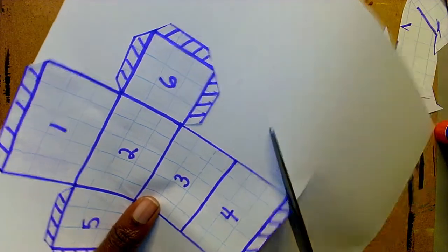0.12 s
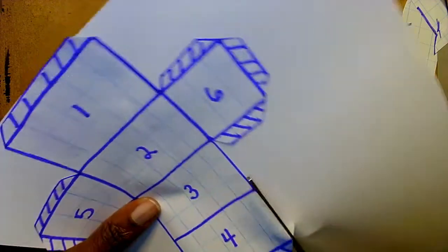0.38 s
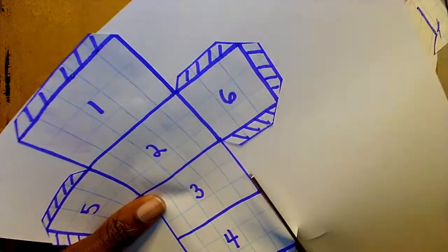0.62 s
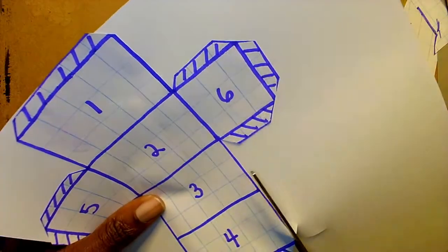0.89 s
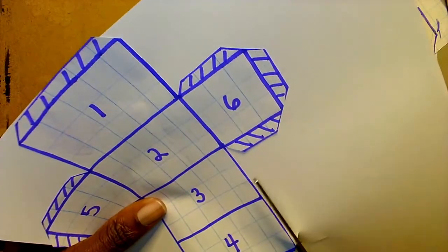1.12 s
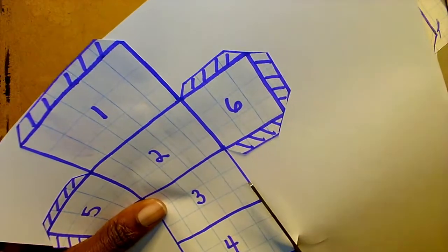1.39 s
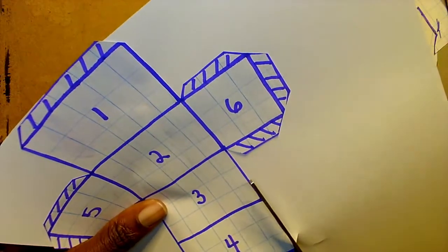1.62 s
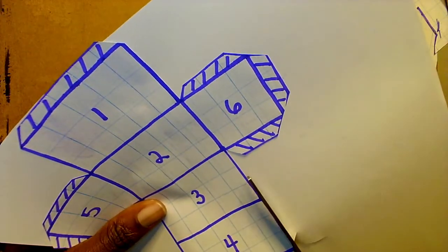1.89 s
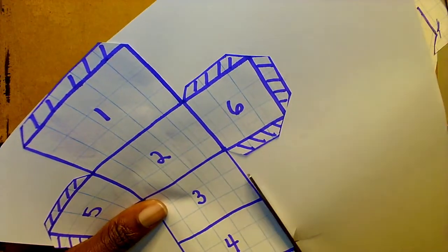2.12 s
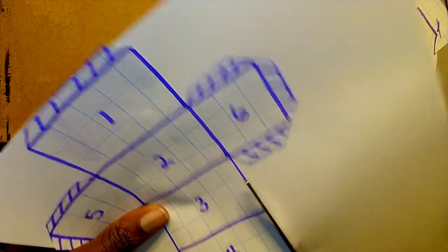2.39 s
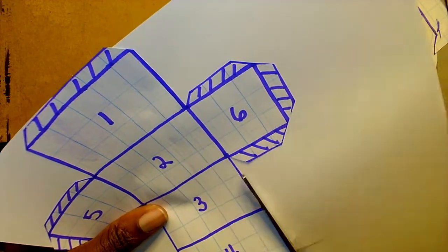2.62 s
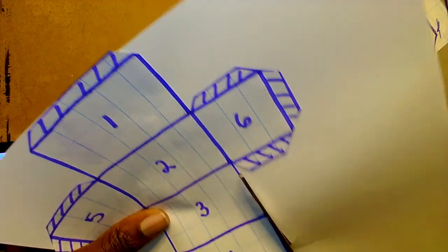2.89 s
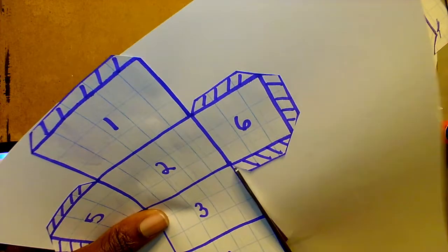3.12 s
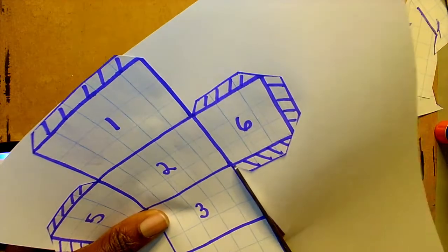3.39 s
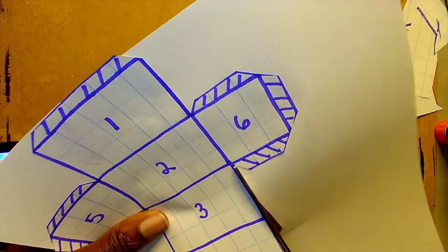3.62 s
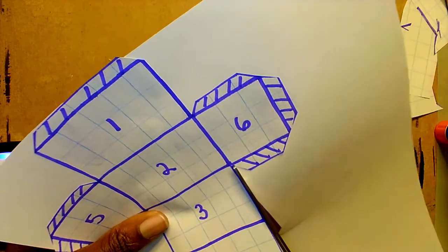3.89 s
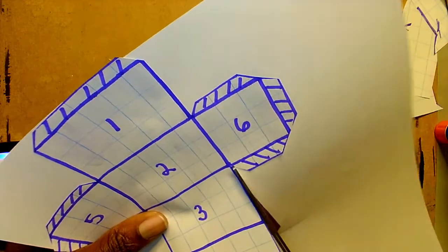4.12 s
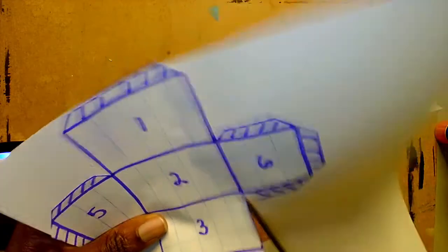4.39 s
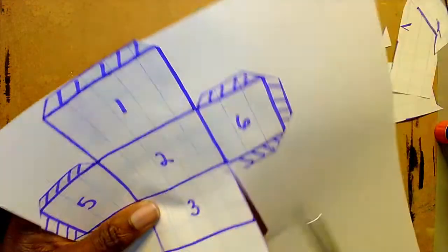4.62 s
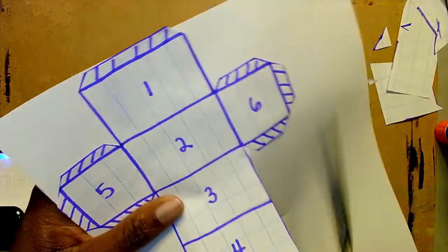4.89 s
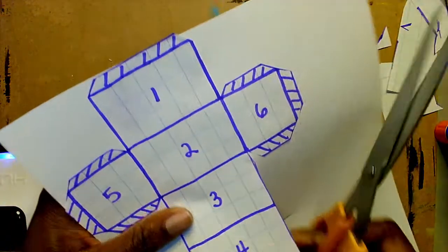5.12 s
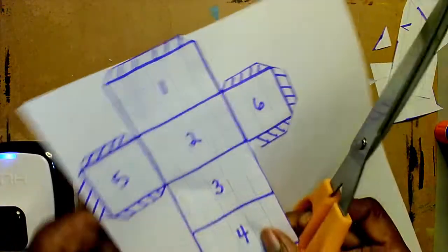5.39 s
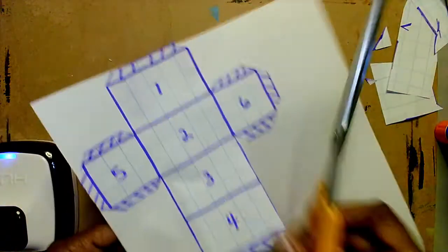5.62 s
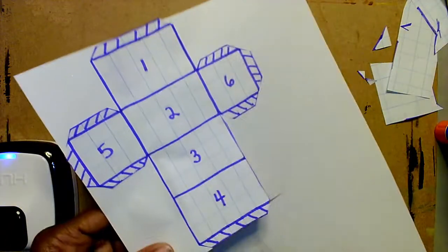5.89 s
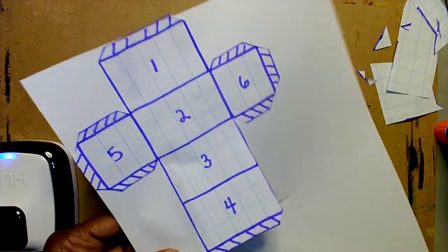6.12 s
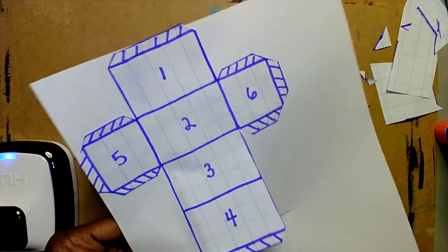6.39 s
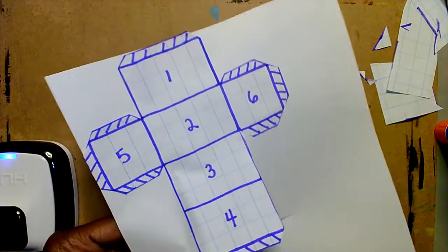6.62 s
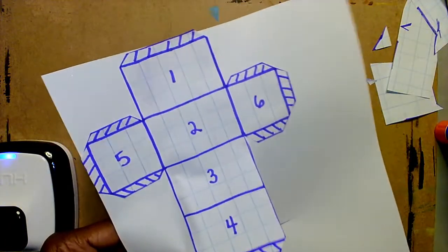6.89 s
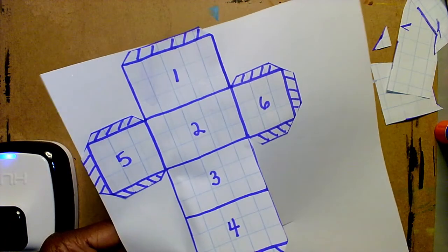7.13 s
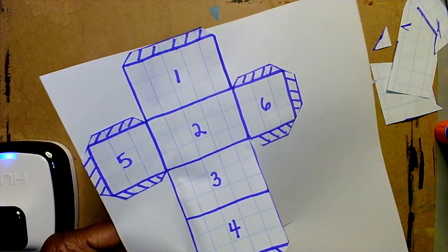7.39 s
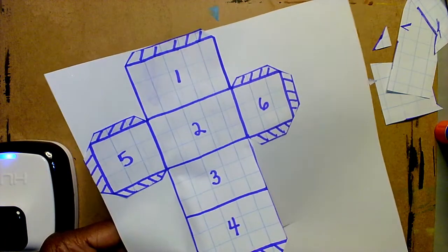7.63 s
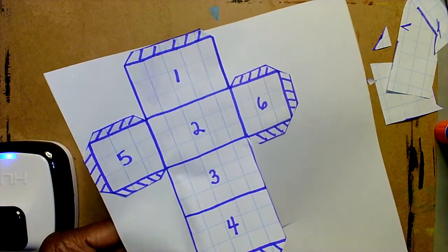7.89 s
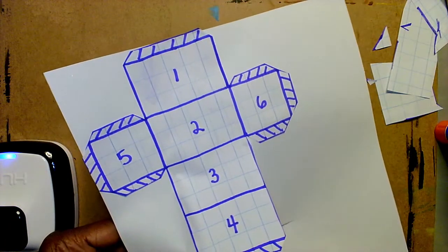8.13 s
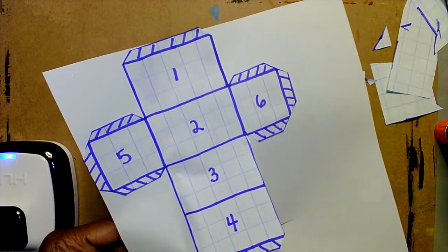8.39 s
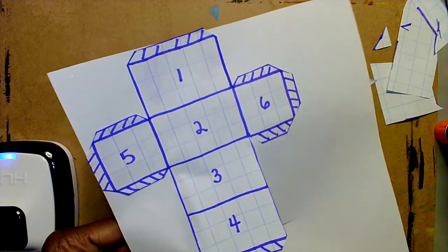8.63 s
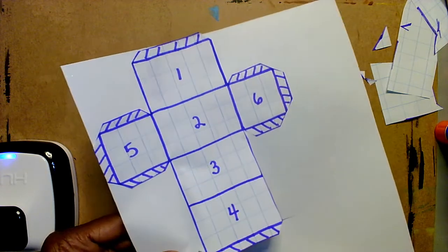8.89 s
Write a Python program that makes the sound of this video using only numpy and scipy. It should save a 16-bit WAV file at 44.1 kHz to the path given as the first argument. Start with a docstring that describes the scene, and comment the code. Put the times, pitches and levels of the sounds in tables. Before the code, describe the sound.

Close, dry scissors and thick paper in a small room with a short echo. A sharp snip at 0.1 s leads into scraping rubs until 0.45; single snips follow at 0.6 and, brightest, 0.95. After small ticks, a dense crunchy cut runs from 1.7 to 2.15 s. Shorter crackling groups come at 2.35-2.65, 3.05, 3.4-3.6 and 3.85-4.1, with dull buckling knocks and pauses between. Around 4.2-4.6 a faint airy squeak glides as the blades open, with hard snaps at 4.3 and 4.4. The freed sheet rustles softly, stronger at 5.1-5.6, then crackles lower as it is turned, with a pop at 6.3, fading by 7. Only very faint ticks remain until crisp little snaps at 8.65-8.9. Low microphone rumble swells unevenly, notably near 1.5 and 3.1 s, over quiet steady hiss.

```python
"""Scissors cut thick paper close to a small microphone: fibres part in short crunchy bursts of crackle.
Between cuts the sheet rubs, knocks and ticks; a faint squeak of gliding noise sounds as the blades open.
The freed sheet then rustles in the hand, crackles lower as it is turned, ticks at rest, and last snaps.
A hard surface two metres away echoes each burst and a small room rings briefly, both as decaying noise.
Throughout, low rumble of band-passed noise swells over a faint shaped hiss."""
import sys
import numpy as np
from scipy import signal
from scipy.fft import rfft, irfft, next_fast_len
from scipy.io import wavfile
from scipy.ndimage import uniform_filter1d, map_coordinates

SR = 44100
rng = np.random.default_rng(int(sys.argv[2]) if len(sys.argv) > 2 else 0)


def unload_wav(signal):
    """Save mono or channel-first audio to the path in sys.argv[1] as 16-bit WAV at rate SR, clipped to [-1, 1]."""
    wavfile.write(
        sys.argv[1],
        SR,
        np.round(np.clip(np.atleast_2d(signal).T, -1, 1) * 32767).astype(np.int16),
    )


def nominal_scale(level):
    """Amplitude ratio for a level in decibels (scalar or array-like)."""
    x = np.asarray(level, float) / 20
    return 10 ** x


N = 397341

# flexing of the sheet: f/Hz, density/dB per Hz
SHEET_SPECTRUM = [(88, -41.5), (150, -10), (257, -5), (461, 0.5), (1070, 1), (2200, -18), (2860, -32),
                  (4840, -120)]
# tearing fibres and blades: f/Hz, density/dB per Hz
RASP_SPECTRUM = [(1200, -26), (1700, -6), (2100, -2), (2700, -8.5), (3200, -3), (4900, -5), (5400, -7.5),
                 (7300, -10), (8400, -17.5), (10500, -43)]
# finest fibres: f/Hz, density/dB per Hz
SIZZLE_SPECTRUM = [(8000, -34.5), (8900, -2.5), (10300, -4), (13000, -10.5), (15700, -12), (16600, -48)]
# higher flexing of the freed sheet, held flat: f/Hz, width/Hz, gain/dB
FREED_RING = (1360, 210, 8)
# share of the finest fibres: t/s, sizzle/dB re rasp
SIZZLE_SHARE = [(0.0, -11), (0.09, -3.5), (0.21, -5.5), (0.34, -12.5), (0.94, -13), (1.06, -8), (1.5, -5.5),
                (1.8, -13), (3.95, -13.5), (4.06, -10), (4.25, -11), (4.29, -21), (4.38, -5.5),
                (5.11, -7.5), (5.53, -5), (5.63, 5), (6.15, -15), (6.9, -11), (8.65, -10), (8.72, -4.5),
                (8.88, -5.5)]
# band in which the blades gripping the sheet ring: t/s, f/Hz
GRIP_BAND = [(0.6, 4000), (1.86, 3950), (1.93, 4300), (2.95, 3940)]
# dull knocks of the buckling sheet: t/s, length/ms, sheet level/dB
BUCKLES = [(0.075, 5.6, -34.5), (0.088, 1.24, -29), (0.649, 6.9, -50.5), (2.403, 3.4, -28.5),
           (3.22, 10.2, -44), (4.287, 4.3, -48.5), (4.113, 3.3, -40), (6.3, 1.47, -35)]

FREED_S = 4.9  # the scissors leave the sheet
CRISP_S = 8.5  # the last snaps follow


def unit(x):
    """Scale to rms 1."""
    return x / np.sqrt(np.mean(x ** 2) + 1e-20)


def along(points, hz):
    """Interpolate (Hz, value) points on a log frequency axis."""
    f, value = np.transpose(points)
    return np.interp(np.log(hz + 1), np.log(f + 1), value)


def curves(rows):
    """One value per sample for each column after the time."""
    s, *columns = np.transpose(rows)
    t_s = np.arange(N) / SR
    return [np.interp(t_s, s, column) for column in columns]


def wobble(rate_hz, count=N):
    """A smooth random curve, rate_hz knots a second."""
    knots = rng.standard_normal(int(count * rate_hz / SR) + 4)
    return map_coordinates(knots, [np.arange(count) * rate_hz / SR])


def response(spectrum, *rings):
    """Minimum-phase impulse response of energy 1; rings raise or lower bands (Hz, width Hz, dB)."""
    size = 4096
    hz = np.fft.rfftfreq(size, 1 / SR)
    ring_db = sum(db * np.exp(-((hz - centre_hz) / width_hz) ** 2) for centre_hz, width_hz, db in rings)
    gain = nominal_scale(np.maximum(along(spectrum, hz), -90) + ring_db)
    cepstrum = irfft(np.log(gain))
    cepstrum[1:size // 2] *= 2  # fold onto positive time: causal
    cepstrum[size // 2 + 1:] = 0
    out = irfft(np.exp(rfft(cepstrum)))[:size // 4]
    return out / np.linalg.norm(out)


def hiss():
    """Room tone and microphone noise: shaped white noise of slowly wandering level."""
    # f/Hz, density/dB per Hz
    hiss_spectrum = [(45, -25), (80, -15.5), (220, -14), (400, -7.5), (540, -16.5), (1460, -18.5),
                     (2800, -32.5), (3700, -29), (7000, -33.5), (10500, -37), (15800, -36)]
    level_db = -70.5 + 1.76 * wobble(6.8)
    return nominal_scale(level_db) * signal.fftconvolve(rng.standard_normal(N), response(hiss_spectrum))[:N]


def noise_band(low_hz, top_hz):
    """Band-passed white noise of rms 1."""
    sos = signal.butter(2, [low_hz, top_hz], "band", fs=SR, output="sos")
    return unit(signal.sosfilt(sos, rng.standard_normal(N)))


def rumble():
    """Low, lumpy rumble at the microphone: an evened noise throb, and thuds in two bands."""
    # t/s, throb level/dB, thud share/dB re throb
    rumble_course = [(0.0, -64.5, -7.5), (1.0, -67, -9), (1.19, -56, -22), (1.28, -50, -7.5),
                     (1.47, -35.5, -30), (1.78, -57.5, -17), (2.04, -58, -7), (2.14, -46.5, -6.5),
                     (2.26, -56.5, -15), (2.65, -53, -14), (3.01, -66, -7), (3.07, -40, -26),
                     (3.25, -59, -11), (3.5, -49, -10), (3.76, -72, -5), (3.86, -46, -19.5),
                     (4.29, -72.5, -4), (5.19, -57, -15.5), (5.27, -70.5, -7), (7.02, -65.5, -15),
                     (7.05, -46.5, -2.5), (7.5, -66.5, -13), (9.01, -73.5, -6.5)]
    db, thud_db = curves(rumble_course)
    thud = noise_band(52.4, 68.8) + nominal_scale(-6.5) * noise_band(96.0, 149.6)
    throb = noise_band(21.04, 33.5)
    envelope = abs(signal.hilbert(throb))
    throb = unit(throb / np.sqrt(envelope + 0.107))  # evens the swells
    return nominal_scale(db) * (throb + nominal_scale(thud_db + 4.8 * wobble(25)) * thud)


def answer():
    """Impulse response: smeared slaps from a hard surface, and a tail dying by frequency."""
    # reverberation: f/Hz, t60/s
    decay = [(200, 0.44), (1000, 0.4), (5000, 0.22), (14000, 0.29)]
    # slaps: delay/s, level/dB re direct
    slaps = [(.0133, -11.5), (.027, -21)]
    hz, t_s, z = signal.stft(rng.standard_normal(SR // 3), SR, nperseg=256)
    fade_db = -60 * t_s / along(decay, hz)[:, None]
    tail = signal.istft(z * nominal_scale(fade_db), SR, nperseg=256)[1]
    out = nominal_scale(-11.5) * np.pad(tail / np.linalg.norm(tail), (round(0.003 * SR), 0))
    smear_s = np.arange(SR // 200) / SR
    for delay_s, db in slaps:
        slap = rng.standard_normal(len(smear_s)) * nominal_scale(-60 * smear_s / 0.0013)
        out[round(delay_s * SR):][:len(slap)] += nominal_scale(db) * slap / np.linalg.norm(slap)
    return out


def room(x):
    """Echoes and tail of a small room, drawn afresh each tenth of a second so no noise pattern repeats."""
    wet, step = np.zeros(N + SR), SR // 10
    for start in range(0, N, step):
        part = signal.fftconvolve(x[start:start + step], answer())
        wet[start:start + len(part)] += part
    return wet[:N]


def pivot():
    """A faint, hazy squeak as the blades open: a narrow band of noise on a gliding pitch."""
    # t/s, level/dB, f/Hz
    squeak = [(4.15, -100, 4527), (4.19, -72, 4600), (4.25, -59, 4780), (4.29, -67, 4700),
              (4.44, -65, 4650), (4.54, -65, 4520), (4.62, -100, 4500)]
    db, hz = curves(squeak)
    carrier = np.exp(2j * np.pi * np.cumsum(hz) / SR)
    haze = wobble(320) + 1j * wobble(320)
    return nominal_scale(db) * np.real(carrier * haze)


def crackle(count, spiky_db, clump_db, stutter_db):
    """Breaking fibres: tiny uneven impulses, bunched as the paper holds and gives way."""
    bunching_db = clump_db * wobble(443.2, count) + stutter_db * wobble(75.3, count)
    spikes_db = spiky_db * np.minimum(rng.exponential(size=count), 4.5)
    return nominal_scale(spikes_db + bunching_db) * rng.standard_normal(count)


def rustle():
    """The freed sheet in the hand: a soft unbroken crackle through sheet, blades and fibres."""
    # t/s, rasp level/dB, sheet/dB re rasp
    rustle_course = [(4.42, -100, -5), (4.45, -66.5, -9.5), (4.8, -65, -1), (4.9, -78, -8), (5.1, -73, -15),
                     (5.125, -59, 2.5), (5.27, -59.5, -4), (5.335, -99, 4), (5.339, -56, -8),
                     (5.53, -67.5, -2), (5.575, -60, -5), (5.65, -66.5, 0.5), (5.69, -73, -13),
                     (5.94, -77.5, -23), (6.0, -70, -9), (6.15, -68, -3), (6.68, -68.5, 1),
                     (6.76, -81, 8.5), (7.0, -77, 12.5), (7.06, -100, 3)]
    # weak band of the rasp: f/Hz, width/Hz, gain/dB
    hollow_band = (3000, 1500, -6)
    db, sheet_db = curves(rustle_course)
    sizzle_db, = curves(SIZZLE_SHARE)
    force = nominal_scale(db) * unit(crackle(N, spiky_db=1.0, clump_db=0.0, stutter_db=2.5))
    layers = [(sheet_db, response(SHEET_SPECTRUM, FREED_RING)),
              (0, response(RASP_SPECTRUM, hollow_band)),
              (sizzle_db, response(SIZZLE_SPECTRUM))]
    return sum(signal.fftconvolve(nominal_scale(share_db) * force, body)[:N] for share_db, body in layers)


def pushes():
    """The buckling sheet shoves the air: one smooth pulse as long as the knock, high-passed."""
    out = np.zeros(N)
    for s, ms, db in BUCKLES:
        count = round(ms * SR / 1000)
        out[round(s * SR):][:count] += nominal_scale(db - 6) * np.hanning(count)
    return signal.sosfilt(signal.butter(1, 40, "high", fs=SR, output="sos"), out)


def is_gripped(s):
    """Whether the blades grip the sheet at s."""
    return GRIP_BAND[0][0] < s < GRIP_BAND[-1][0]


def stroke_force(s, ms, slip):
    """Force envelope: slips and blade rubs rise and stop quickly, hand rubs swell and fade gently."""
    by_hand = FREED_S < s < CRISP_S and not slip
    swell_share = 0.3 if by_hand else 0.076
    rise_ms = min(1.613, 0.55 * ms) + swell_share * ms  # tension builds
    fall_ms = 1.4 + swell_share * ms  # and lets go
    t_ms = np.arange(round((ms + fall_ms) * SR / 1000)) * 1000 / SR
    shape = np.clip(t_ms / rise_ms, 0, 1) * np.clip((ms + fall_ms - t_ms) / fall_ms, 0, 1)
    if by_hand:
        shape = shape ** 2  # a hand swells and fades more gently than a blade
    if slip:
        sag_db = 6.5 if is_gripped(s) else 2
    else:
        sag_db = 0 if by_hand else 2
    return shape * nominal_scale(-sag_db * t_ms / ms)


def stroke_bodies(s, slip, resting_hz):
    """Responses of sheet, rasp and sizzle at s; grip, handling and rest raise their own bands."""
    # blades gripping the sheet, narrow band: f/Hz, width/Hz, gain/dB
    grip_edge = (4860, 180, 4.5)
    # lower crackle of the sheet turned in the hand: from/s, to/s, f/Hz, width/Hz, gain/dB
    turned_sheet = (6.1, 7.05, 2500, 680, 7.8)
    sheet_rings = [FREED_RING] if s > FREED_S else []
    rasp_rings, sizzle_rings = [], []
    if s > CRISP_S and slip:  # two bright bands (Hz, width Hz, dB)
        rasp_rings, sizzle_rings = [(6500, 730, 15)], [(12900, 1200, 19)]
    if s in resting_hz:
        rasp_rings = [(resting_hz[s], 500, 12)]
    if is_gripped(s):
        rasp_rings = [(np.interp(s, *np.transpose(GRIP_BAND)), 750, 7), grip_edge]
    if turned_sheet[0] < s < turned_sheet[1]:
        rasp_rings = [turned_sheet[2:]]
    return np.array([response(SHEET_SPECTRUM, *sheet_rings), response(RASP_SPECTRUM, *rasp_rings),
                     response(SIZZLE_SPECTRUM, *sizzle_rings)])


def strokes():
    """Slips, rubs, knocks and ticks: bursts of crackle, each through sheet, blades and fibres."""
    # slips of the blades and snapping creases: t/s, length/ms, rasp level/dB, sheet/dB re rasp
    slips = [(0.08, 2.25, -28.5, -20), (0.186, 3.5, -34, -12), (0.197, 5.3, -46.5, -2),
             (0.203, 1.7, -38, -11), (0.629, 1.74, -36, -8), (0.945, 1.16, -25, -13),
             (0.948, 1.7, -30.5, -12), (1.06, 2.8, -39.5, -2.5), (1.316, 2.5, -46, 6.5),
             (1.743, 13, -48.5, 4.5), (1.775, 9.1, -43.5, -2), (1.819, 22, -51, 0), (1.844, 5.9, -41, 0),
             (1.872, 14, -52.5, 2), (1.9, 12.6, -47, -0.5), (1.942, 11.6, -43, 2), (1.99, 11.3, -51, 1),
             (2.03, 14.5, -45, 2), (2.072, 9.5, -45, -5), (2.093, 25, -49, 1), (2.126, 9.4, -43.5, -3),
             (2.141, 13.2, -43, 3), (2.54, 7.7, -47, 4), (2.584, 5.5, -37.5, -4), (2.623, 2.7, -40.5, 7),
             (2.666, 10.4, -38, 2), (2.994, 9.5, -56.5, 0.5), (3.042, 10.5, -39, 1.5),
             (3.079, 6, -46.5, 3.5), (3.384, 3.9, -34.5, -5.5), (3.417, 3.25, -36, 4),
             (3.454, 4.2, -44, -1), (3.459, 7.7, -37, -2), (3.499, 5.7, -37.5, 0.5),
             (3.594, 7.6, -36, -0.5), (3.849, 4.1, -40.5, -4.5), (3.86, 9.3, -40, -3),
             (3.94, 8.3, -29.5, -4.5), (4.054, 2.5, -40, -35), (4.114, 6.2, -41.5, 2.5),
             (4.293, 3.54, -28.5, -4.5), (4.314, 1.03, -32, 0), (4.366, 13, -46.5, 0.5),
             (4.375, 4.3, -29.5, -11), (5.109, 7.2, -47.5, 2.5), (5.459, 3.6, -53, 5),
             (5.471, 5.3, -54.5, 8), (5.637, 3.5, -47, -10), (6.3, 3.1, -38.5, 6.5), (8.689, 2.8, -41, -2),
             (8.693, 4.6, -43.5, 1), (8.71, 3.9, -48.5, 1), (8.795, 3.4, -43, -5), (8.868, 3, -34.5, -11)]
    # longer rubs and tears: t/s, length/ms, rasp level/dB, sheet/dB re rasp
    rubs = [(0.0, 73, -56, -1.5), (0.07, 118, -52, -3.5), (0.19, 114, -53.5, -3), (0.305, 65, -62, 2.5),
            (0.361, 93, -55, 3.5), (0.917, 41, -52.5, 0.5), (0.96, 56, -63, 8), (1.021, 100, -64.5, 11),
            (1.197, 25, -62, 4), (1.233, 12, -65, 9.5), (1.302, 29, -62, 6), (1.33, 112, -82, 19),
            (1.62, 80, -67, 5), (1.715, 37, -51.5, -2), (2.337, 83, -51.5, 3.5), (2.429, 100, -78.5, 19),
            (2.547, 33, -48, 2), (2.604, 26.3, -41, -2), (2.8, 114.5, -53.5, 4.5), (3.035, 29, -52, 7),
            (3.235, 70, -63.5, 11), (3.267, 27, -56, -1), (4.132, 620, -65.5, -4), (4.347, 18, -49, -16),
            (4.378, 26.8, -41, -4), (5.36, 125, -63.5, -6), (6.142, 48.4, -51, 1.5), (6.34, 33, -56.5, 3.5),
            (6.485, 25, -60, 2), (6.566, 42, -52.5, -6), (6.815, 34, -59, -0.5), (6.973, 26, -66, -5),
            (8.623, 9.9, -55, -2), (8.636, 16, -56, 1), (8.658, 53, -55.5, -2), (8.712, 200, -69, -1.5)]
    # ticks of the relaxing sheet: t/s, rasp level/dB
    relaxing = [(0.785, -62), (0.984, -49), (1.01, -50.5), (1.414, -59.5), (1.57, -57.5), (1.63, -58.5),
                (1.679, -54), (3.32, -55.5), (3.366, -54), (4.721, -60)]
    # ticks of the sheet at rest, each in its own band: t/s, rasp level/dB, f/Hz
    resting = [(7.114, -67.5, 2600), (7.256, -78, 4320), (7.549, -72, 2950), (7.826, -75, 4500),
               (8.004, -79, 4200), (8.2, -74.5, 6500)]
    resting_hz = {s: hz for s, _, hz in resting}
    knock_rasp_db = -24.5  # re sheet
    others = list(rubs) + [(s, ms, db + knock_rasp_db, -knock_rasp_db) for s, ms, db in BUCKLES]
    others += [(s, 3.6, db, 0) for s, db in relaxing]
    others += [(s, 10.8, db, 0) for s, db, _ in resting]
    events = [(True, *row) for row in slips] + [(False, *row) for row in others]
    out = np.zeros(N + SR)
    for slip, s, ms, rasp_db, sheet_db in events:
        shape = stroke_force(s, ms, slip)
        force = shape * crackle(len(shape), spiky_db=3.0, clump_db=1.5, stutter_db=0.5)
        parts = signal.fftconvolve(force[None], stroke_bodies(s, slip, resting_hz), axes=1)
        sizzle_db = np.interp(s, *np.transpose(SIZZLE_SHARE))
        levels = nominal_scale(rasp_db + np.array([sheet_db, 0, sizzle_db])) * np.linalg.norm(shape)
        sound = (levels / np.linalg.norm(parts, axis=1)) @ parts
        out[round(s * SR):][:len(sound)] += sound
    return out[:N]


def patchy_colour(x, patchy_db):
    """Smooth random gains over time and frequency make the crackle uneven."""
    z = signal.stft(x, nperseg=128)[2]
    field = uniform_filter1d(rng.standard_normal(z.shape), size=3, axis=0)
    field = uniform_filter1d(field, size=16, axis=1)
    gain_db = patchy_db * unit(field) - 0.14 * patchy_db ** 2  # offsets the power the patches add
    return signal.istft(z * nominal_scale(gain_db), nperseg=128)[1][:N]


def paper():
    """Strokes and rustle in patchy colour, plus the pushes of the sheet on the air."""
    return patchy_colour(strokes() + rustle(), patchy_db=1.5) + pushes()


def scene():
    """Paper and scissors in the room, over rumble and hiss."""
    near = paper() + pivot()
    return (near + room(near) + rumble() + hiss())[None]


def roll_off(x):
    """The treble ends steeply here."""
    return signal.sosfilt(signal.butter(12, 16650, fs=SR, output="sos"), x)


def record(dry):
    """The microphone port dips in the treble: a Gaussian notch in dB."""
    # f/Hz, width/Hz, gain/dB
    port_dip = (8990, 585, -12.5)
    centre_hz, width_hz, db = port_dip
    size = next_fast_len(N)
    hz = np.fft.rfftfreq(size, 1 / SR)
    dip = nominal_scale(db * np.exp(-((hz - centre_hz) / width_hz) ** 2))
    mix = irfft(rfft(dry, size) * dip, size)[:, :N]
    return roll_off(mix)


dry = scene()
out = record(dry)
unload_wav(out)
```